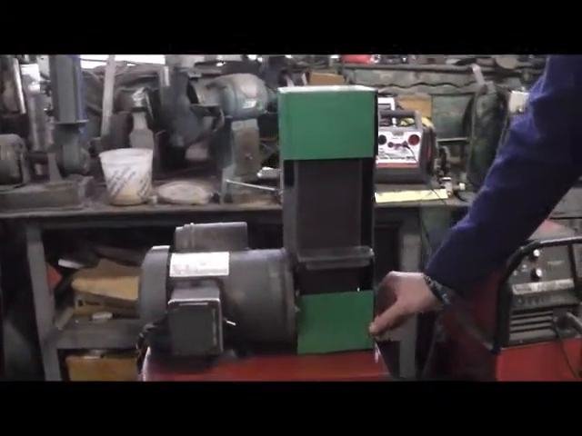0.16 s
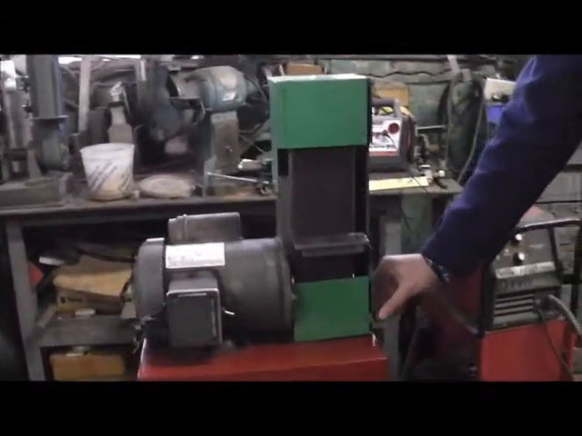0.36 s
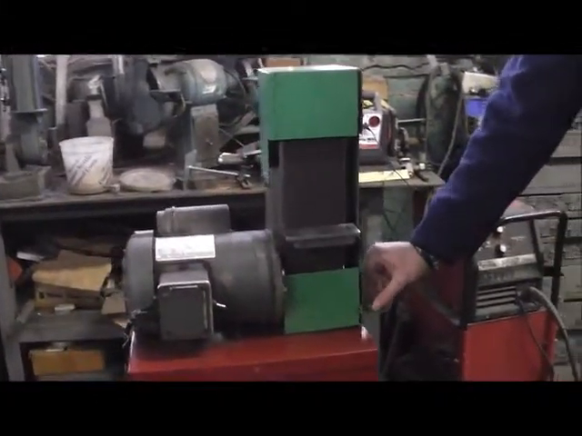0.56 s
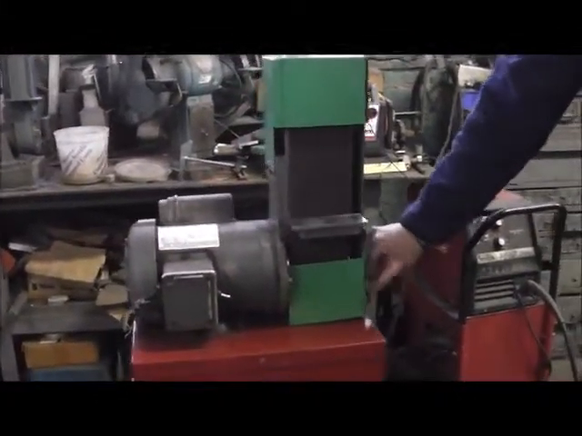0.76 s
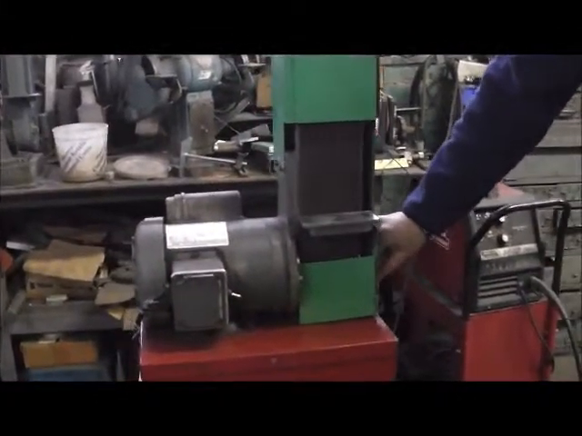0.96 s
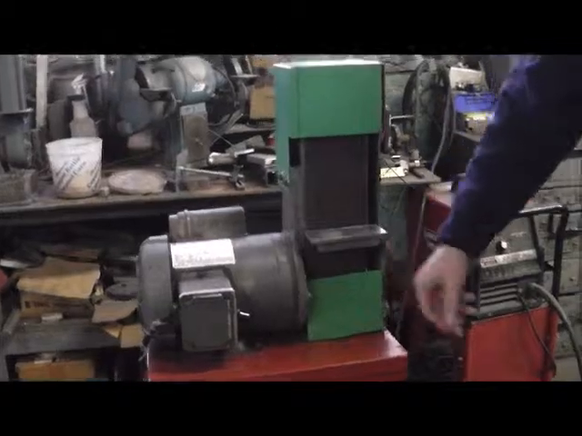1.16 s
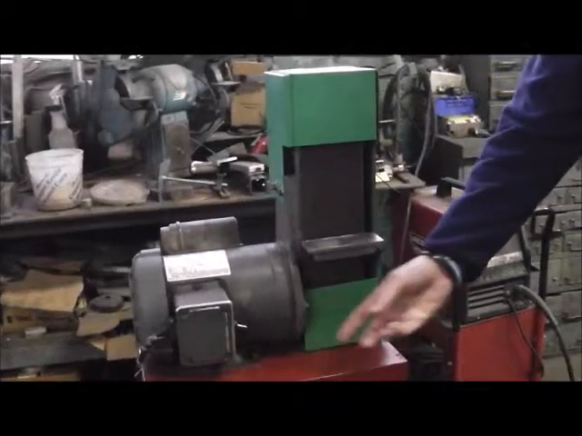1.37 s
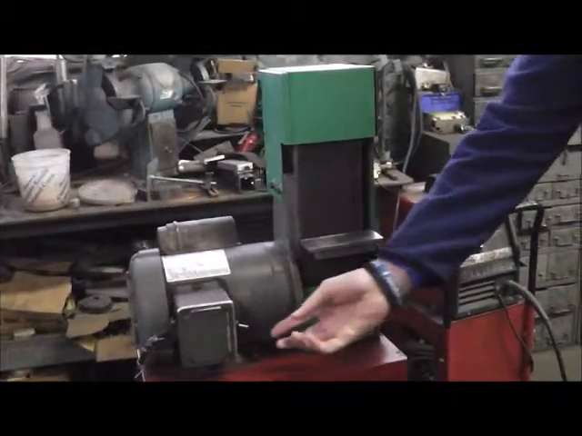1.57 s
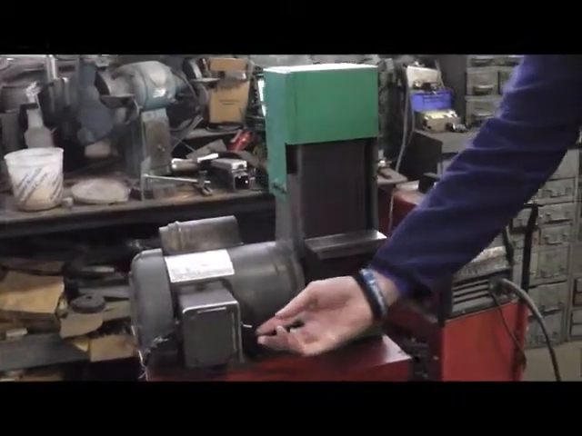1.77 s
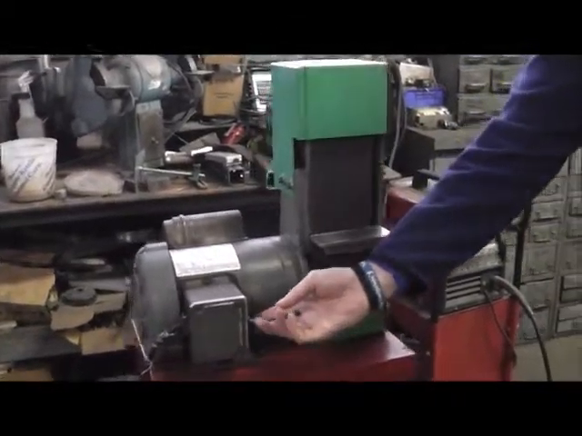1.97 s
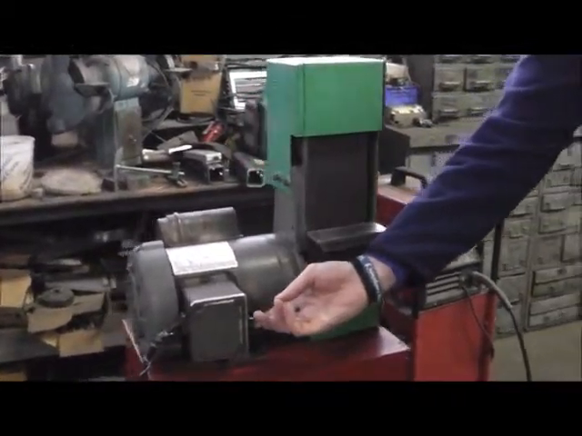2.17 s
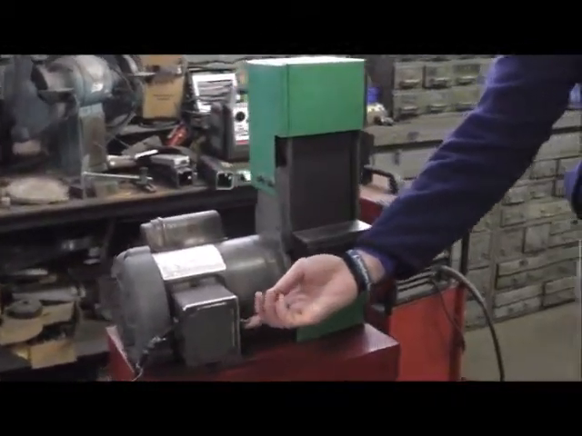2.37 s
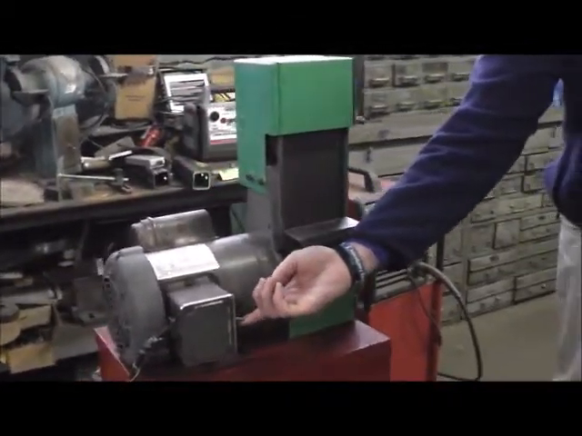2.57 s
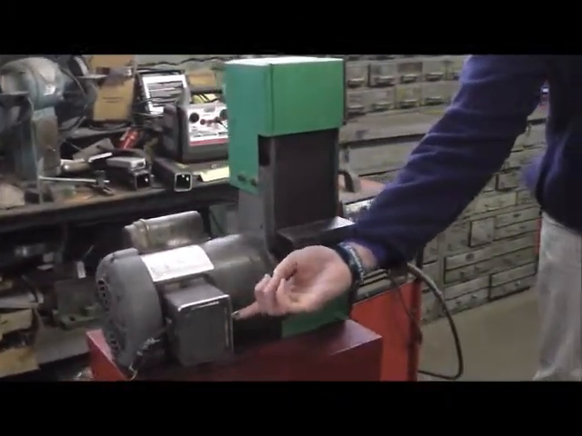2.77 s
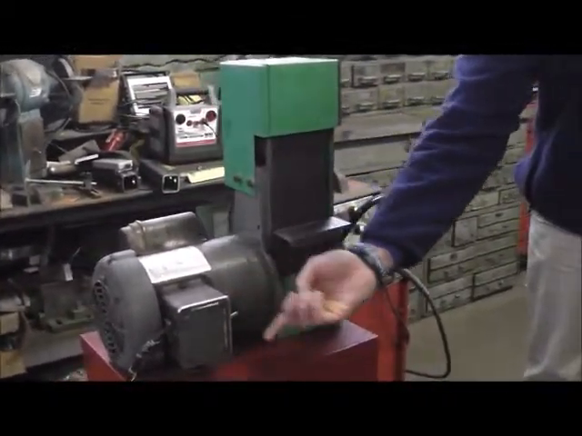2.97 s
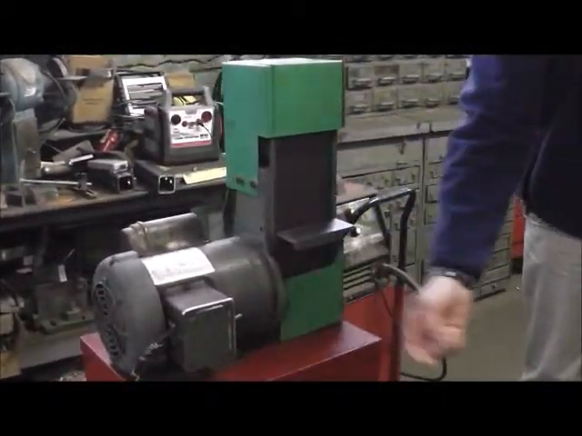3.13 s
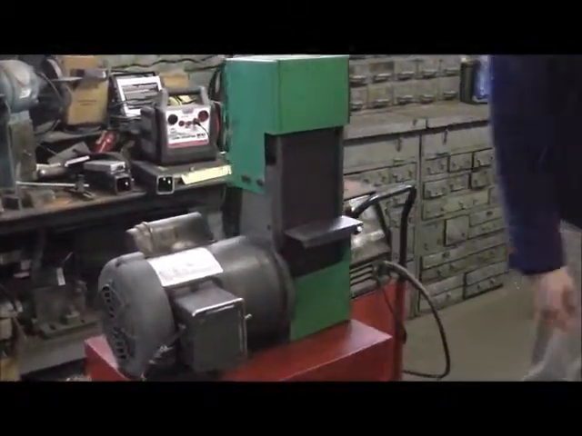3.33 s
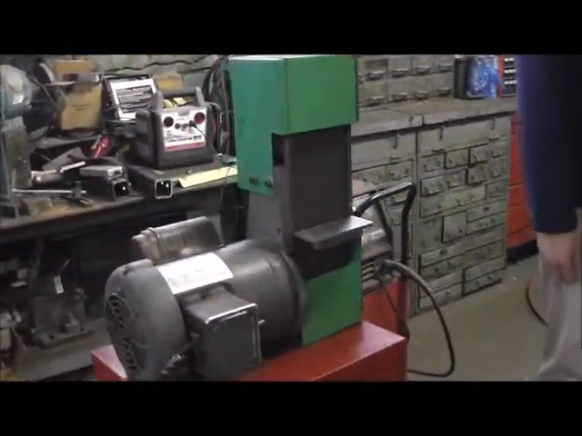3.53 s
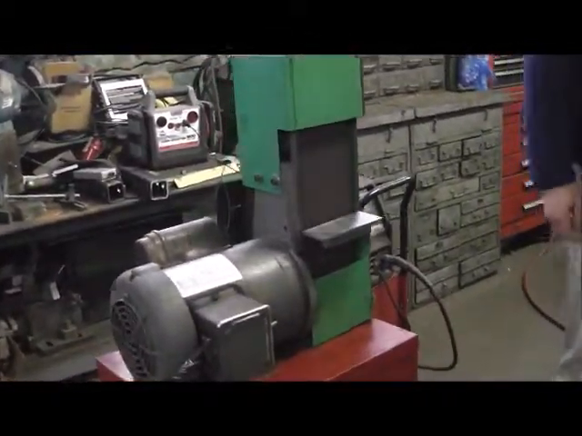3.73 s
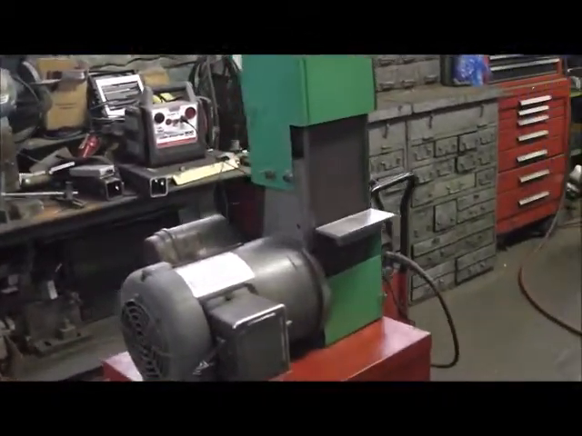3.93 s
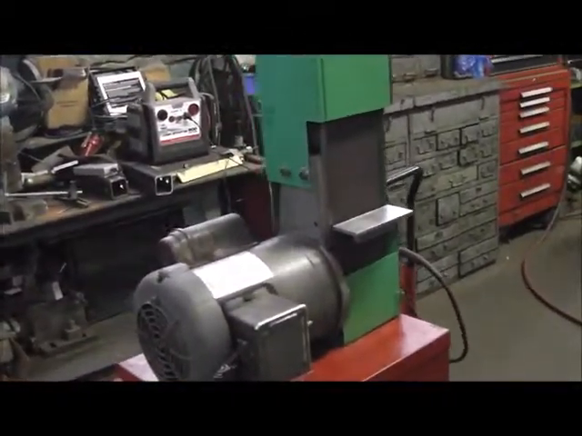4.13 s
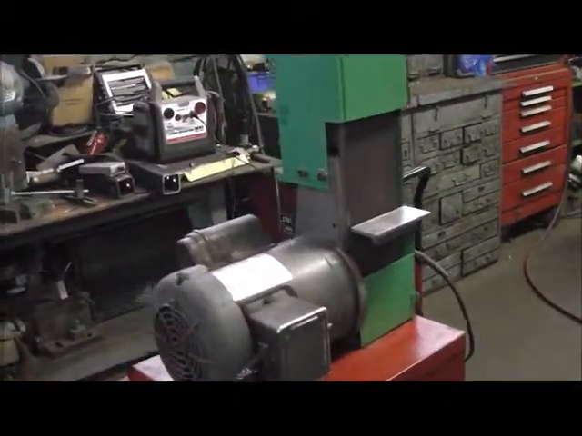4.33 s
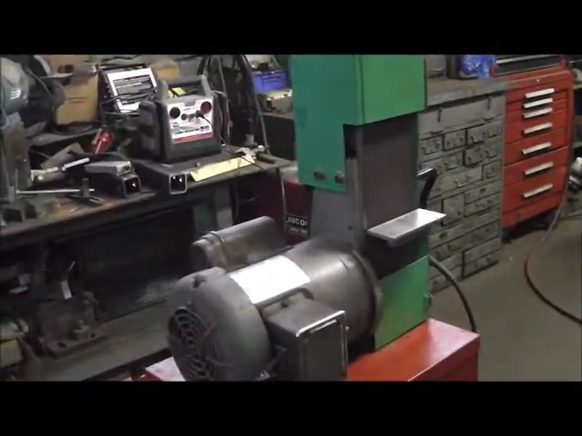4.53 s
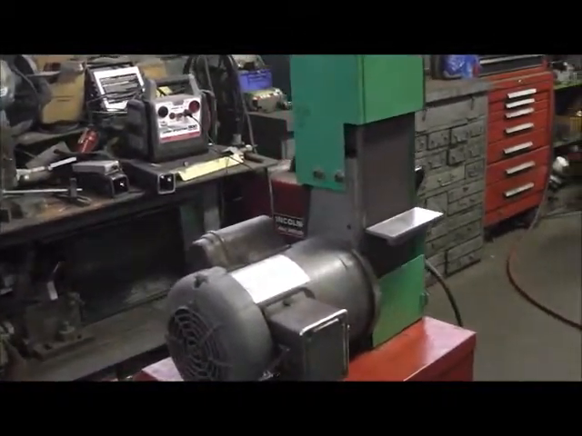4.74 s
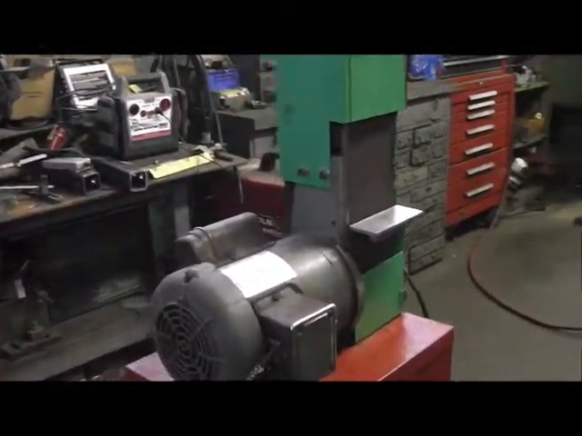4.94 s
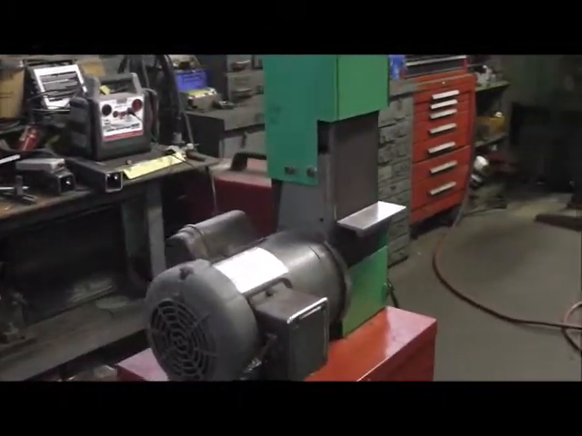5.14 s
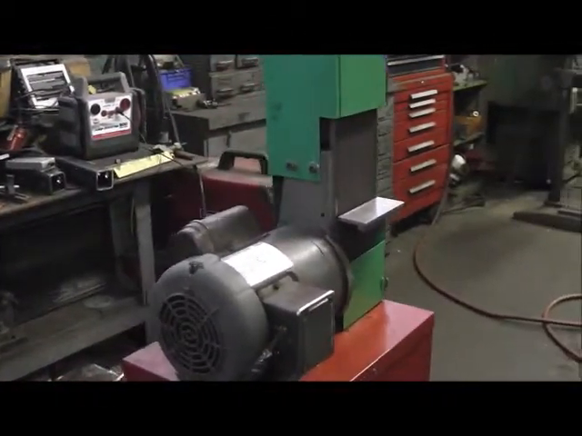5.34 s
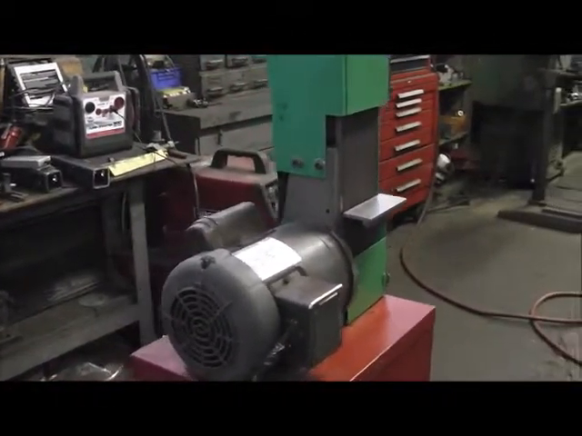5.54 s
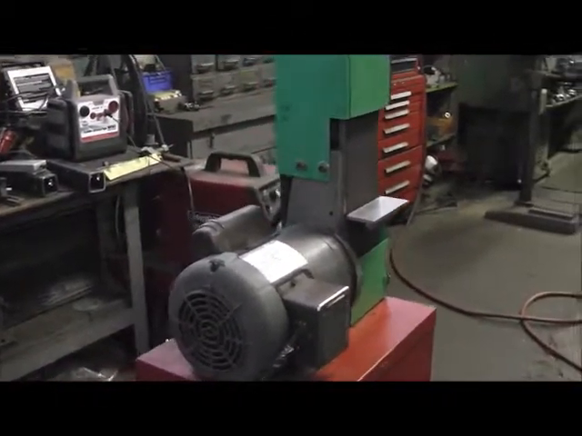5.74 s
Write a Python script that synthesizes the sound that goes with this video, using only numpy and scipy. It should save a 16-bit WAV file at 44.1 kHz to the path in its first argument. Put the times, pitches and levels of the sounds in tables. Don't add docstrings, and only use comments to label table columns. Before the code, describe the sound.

In an indoor machine shop with deep distant rumble, a hand knocks metal sharply, brushes and ticks against parts, and clatters on a bench. Just before three seconds a power switch snaps. A belt sander spins up in half a second with a rising whine and brief chirp, then runs steadily with singing fan tone, gritty hiss and air roar. Handheld camera microphone, close, slight room echo.

```python
import sys
import numpy as np
from scipy import signal
from scipy.fft import rfft, irfft, next_fast_len
from scipy.io import wavfile
from scipy.ndimage import map_coordinates

SR = 44100
rng = np.random.default_rng(int(sys.argv[2]) if len(sys.argv) > 2 else 0)


def to_linear_factor(level_db):
    exponent = np.asarray(level_db, float) / 20
    return 10 ** exponent


def master_out(mix):
    frames = np.transpose(np.atleast_2d(mix))
    ceiling = np.clip(frames, -1, 1)
    pcm = np.round(ceiling * 32767).astype(np.int16)
    wavfile.write(sys.argv[1], SR, pcm)


N = 255780

# time in seconds, rumble level in dB.
SHOP_RUMBLE = [(0, -31.5), (.11, -34.5), (.27, -26), (.32, -37.5), (.44, -29), (.69, -31), (.87, -24.5),
               (.93, -48.5), (1.13, -33), (1.25, -28), (1.37, -31), (1.76, -32), (1.89, -26), (2.16, -30),
               (2.42, -25.5), (2.74, -31), (2.83, -45), (2.88, -33.5)]
# frequency in Hz, level in dB per Hz.
RUMBLE_COLOUR = [(12, -32.5), (20, 5), (75, 4.5), (130, -6.5), (170, -45), (290, -120)]
DRONE_COLOUR = [(53, -27.5), (90, -8.5), (180, -2), (350, -10), (520, -11.5), (800, -13.5), (1200, -21),
                (1500, -22), (2050, -30), (2400, -42), (3300, -47.5), (4200, -70)]
DRONE_DB, DRONE_RISE_DB_PER_S = -39.5, 1.522
PRESSED_RUMBLE_DB, PRESSED_DRONE_DB = -37.5, -40.5

# peak in seconds, rise in seconds, fall in seconds, soft
# level in dB, bright level in dB.
RUSTLE = [
    (.3, .7, 0.154, -52, -59.5),
    (.655, 0.029, 0.033, -49.5, -45.5),
    (.7, 0.03, 0.0183, -42, -50.5),
    (.95, 0.135, 0.253, -54.5, -65),
    (1.61, 0.061, 0.095, -53, -48),
    (2.04, 0.0163, 0.045, -58.5, -51.5),
    (2.095, 0.016, 0.0624, -43, -42),
    (2.65, 0.185, 0.216, -62, -59),
]
# soft level in dB, bright level in dB.
STILL_DB = [-58.5, -61]
# frequency in Hz, level in dB per Hz.
SOFT_COLOUR = [(2600, -29.5), (3000, -10.5), (3800, -4.5), (4600, -1), (5600, -2), (6800, -2.5),
               (8500, -13.5), (11000, -41)]
BRIGHT_COLOUR = [(5500, -23), (7000, -6), (9000, -1), (11000, -2), (13000, -5.5), (15000, -12.5),
                 (17000, -13)]

# time in seconds, bright peak in dB, thud in dB over it,
# soft crack in dB over it, time to fall 60 dB in seconds.
KNOCKS = [
    (0.1163, -5, -14.5, -10.5, 0.0715),
    (0.4131, -22, -1.5, 1, 0.0475),
    (0.8765, -30.5, -3, -4.5, 0.028),
    (0.8934, -5.5, -17, -13, 0.0315),
    (0.8962, -3, -19, -11, 0.04),
    (0.908, -8, -11.5, -13.5, 0.025),
    (0.914, -6.5, -10, -9, 0.032),
    (1.026, -18, -10, -11, 0.0385),
    (2.0841, -21.5, -7.5, -9.5, 0.068),
]
SWITCH = [
    (2.7855, 0, -32, -12, 0.0178),
    (2.7878, -10, -29.5, -8, 0.0237),
    (2.8, -24.5, -9.5, -3.5, .03),
]
# time in seconds, bright peak in dB, thud in dB over it.
TICKS = [(0.433, -42, 11.5), (0.5013, -39.5, 6.5), (0.5614, -38, 3), (0.6025, -31.5, -0.5),
         (0.6791, -33, 0.6), (0.7039, -33, 3.5), (0.836, -47.5, 1), (1.609, -35, 3), (2.2094, -44, 8.5),
         (2.3477, -48.5, 13.5), (2.385, -46, 1), (2.4486, -41, -4.5), (2.4547, -44.5, 4)]
# frequency in Hz, level in dB per Hz.
THUD_COLOUR = [(240, -39.5), (400, -5.5), (686, -2.5), (953, -11), (1250, -2.5), (2410, -20), (3000, -28.5),
               (3900, -58), (6600, -120)]
# frequency in Hz, level in dB,
# time to fall 60 dB in seconds.
PLATE = [(825, -8.5, 0.194), (1273.5, -6.5, 0.11), (1773, -11, .09), (1938, -1.5, 0.051), (4983, 1, .07),
         (5160, -6, 0.054), (5090, -26.5, .3), (5200, -30.5, 0.28)]
BENCH = [(317.6, -2, 0.52), (480.8, -6.5, 0.255), (656, -2, 0.27), (790.5, -3.5, 0.187),
         (1059.6, -3.5, .25), (1276, -4.5, 0.304), (1774, -7.5, 0.26), (4900, -17.5, .4)]
# time in seconds, level in dB.
PLATE_BLOWS = [
    (0.117, -16),
    (.413, -35.5),
]
BENCH_BLOWS = [
    (.897, -27.5),
    (.912, -24.5),
]

# time in seconds, peak in dB, time to fall 60 dB in seconds.
SNAPS = [
    (1.5016, -17.5, .012),
    (1.5971, -15, .012),
    (2.7876, -8.5, .025),
]
# frequency in Hz, width in Hz, level in dB.
HOUSING = [(700, 600, -5), (1434, 350, 1), (2058, 400, -4.5), (3200, 800, -22), (4570, 800, -20)]

# frequency in Hz, time to fall 60 dB in seconds.
HALL = [(300, 1), (2000, 1), (6000, 0.633), (10000, 0.498), (14000, 0.31)]
# frequency in Hz, side over mid in dB.
SIDE_DB = [(60, -17.5), (110, -17), (200, -23), (380, -19), (700, -17.5), (1290, -20), (2380, -19),
           (4400, -13), (8120, -17.5), (15000, -7)]

# time in seconds, share of full speed.
SPEED = [(2.79, 0), (2.935, .3), (3.03, .495), (3.065, .61), (3.12, .78), (3.17, .88), (3.2, .925),
         (3.245, .998), (3.3, 1)]
SHAFT_HZ, BLADES = 59.43, 11
LAP = 2159

# time in seconds, level in dB.
NEARNESS = [(3.19, -18.5), (3.36, -19), (3.39, -23.5), (3.44, -19), (3.57, -21), (3.97, -18.5), (4.12, -20),
            (4.44, -19), (4.47, -22), (4.75, -20.5), (5.18, -19.5), (5.21, -21.5), (5.34, -19.5),
            (5.48, -19), (5.61, -21), (5.8, -18)]
# frequency in Hz, level in dB per Hz.
ROAR_COLOUR = [(35, -50.5), (60, -33.5), (160, -33), (251, -6), (350, -13), (577, -7), (648, -2.5),
               (716, -6), (1220, -7), (1300, -6), (1390, -6), (2010, -11), (2220, -19), (3200, -38),
               (4160, -64.5), (7040, -120)]
GRIT_COLOUR = [(1650, -39.5), (2800, -9), (3240, -12.5), (3720, -9), (4060, -2.5), (6020, -4.5),
               (7390, -0.5), (10600, 2), (13100, -6.5), (15000, -14), (17000, -18)]
ROAR_DB, GRIT_DB = -22.5, -19.5
AWAKE_SHARE, WAKE_DB = 0.4752, 55.5
# multiple of the lap rate, level in dB.
DENTS = [(20, -35.5), (21, -35.5), (22, -35), (23, -32), (25, -38.5), (26, -31), (29, -31), (31, -35),
         (36, -28.5), (39, -30.5), (59, -31), (81, -43.5), (83, -41.5), (87, -42.5), (89, -36.5),
         (99, -37.5)]

# multiple of the blade rate, full level in dB,
# speed share where it is fully awake, dB lost per share below that.
FAN = [(1, -20, .76, 150), (2, -17, 0.969, 124.5), (3, -37.5, 1, 38)]
# time in seconds, half length in seconds, lift in dB.
FAN_ZONES = [
    (3.2, .3, 2.5),
    (4.1, 0.32, 1.05),
    (4.953, 0.66, 7.5),
]
FAN_PASS_DB, FAN_PASS_SHARE, FAN_PASS_WIDTH = 3, 0.772, 0.132
GLIDE_ROUGH_DB = 20
# time in seconds,
# half length in seconds, low tones in dB, middle tones in dB.
HUM = [
    (3.374, 0.064, -28.5, -44.5),
    (3.549, 0.11, -38.5, -33),
    (4.075, 0.1, -43.5, -31.5),
    (4.304, 0.172, -27.5, -24.5),
    (4.718, 0.18, -42, -24),
    (4.998, 0.128, -49, -32),
    (5.68, 0.145, -27, -23),
]
HUM_LEAST_DB = -47
# multiple of the shaft rate, level in dB.
LOW_ORDERS = [(1, -9.5), (2, -2)]
MID_ORDERS = [(4, -3.5), (4.97, -4), (6, -14), (8, -12)]
SLOT_DB, SLOT_SHARE = -21.5, .49
SLOT_RISE_DB, SLOT_FALL_DB = 62, 80
# time in seconds, level in dB.
SQUEALS = [
    (2.935, -26.5),
    (2.963, -22),
    (3.003, -37),
]
SQUEAL_S = 0.0078
# time in seconds, first frame mode in dB, second in dB.
STRAIN = [
    (2.84, -28, -28),
    (2.868, -34.5, -29),
    (2.896, -26.5, -19),
    (2.931, -28, -21),
    (2.952, -25.5, -15),
    (2.994, -17.5, -19.5),
    (3.014, -28, -14),
    (3.043, -31.5, -18),
    (3.13, -26, -33),
]
THROB_S = [0.02, .01]
# frequency in Hz, level in dB.
FRAME = [
    [(250, -1)],
    [(515, 0.5), (560, -8.5), (770, -11), (1240, -17.5)],
]

# frequency in Hz, left over right in dB.
LEAN = [(60, 1), (110, 1), (200, 1.0), (380, 1.5), (700, 1.0), (1290, 1.5), (2380, 2), (4400, -2),
        (10000, -3), (13500, -2.47)]
# frequency in Hz, radians by which left leads.
LAG = [(0, 0.084), (7240, -0.024), (10800, 0.12), (12600, 1.67), (14600, 0.18), (16400, -0.0)]
HISS_DB, TOP_HZ = -64.5, 15720


def unit(x):
    return x / np.sqrt(np.mean(x ** 2) + 1e-20)


def along(points, hz):
    f, v = np.transpose(points)
    return np.interp(np.log(hz + 1), np.log(f + 1), v)


def curves(rows):
    s, *cols = np.transpose(rows)
    return [np.interp(np.arange(N) / SR, s, c) for c in cols]


def wobble(rate):
    coarse = np.arange(0, N + 32, 32)
    knots = rng.standard_normal(int(N * rate / SR) + 4)
    return np.interp(np.arange(N), coarse, map_coordinates(knots, [coarse * rate / SR]))


def swell(s, rise, fall, order=2):
    coarse = np.arange(0, N + 32, 32)
    late = coarse / SR - s
    bell = np.exp(-np.abs(late / np.where(late < 0, rise, fall)) ** order)
    return np.interp(np.arange(N), coarse, bell)


def summed_db(gains):
    return 20 * np.log10(sum(gains) + 1e-7)


def coloured(x, spectrum):
    m = next_fast_len(N + 8192)
    gain = to_linear_factor(along(spectrum, np.fft.rfftfreq(m, 1 / SR)))
    return irfft(rfft(x, m) * gain, m)[..., :N]


def spread(pair, spectrum):
    mid, side = coloured(pair, spectrum)
    side = coloured(side, SIDE_DB)
    return unit(np.array([mid + side, mid - side]))


def tone(turns, multiple, db, rough_db, pace=25):
    strength = np.sqrt(2) * to_linear_factor(db + rough_db * wobble(pace))
    return strength * np.sin(2 * np.pi * (multiple * turns + rng.random()))


def room_noise(spectrum):
    return spread(rng.standard_normal((2, N)), spectrum)


def shop(speed):
    pressing = np.minimum(4 * speed, 1)
    rumble_db = curves(SHOP_RUMBLE)[0]
    rumble_db = rumble_db + (PRESSED_RUMBLE_DB - rumble_db) * pressing
    rumble = to_linear_factor(rumble_db + 1.49 * wobble(11)) * room_noise(RUMBLE_COLOUR)
    drone_db = DRONE_DB + DRONE_RISE_DB_PER_S * np.arange(N) / SR
    drone_db = drone_db + (PRESSED_DRONE_DB - drone_db) * pressing
    drone = to_linear_factor(drone_db + 8.5 + 1.2 * wobble(3.005) + 1.18 * wobble(14)) * room_noise(DRONE_COLOUR)
    soft, bright = to_linear_factor(STILL_DB[0]), to_linear_factor(STILL_DB[1])
    for s, rise, fall, soft_db, bright_db in RUSTLE:
        stroke = swell(s, rise, fall, order=1)
        soft = soft + to_linear_factor(soft_db) * stroke
        bright = bright + to_linear_factor(bright_db) * stroke
    grain = to_linear_factor(1.29 * wobble(90) + 0.31 * wobble(24.98))
    return rumble + drone + grain * (soft * room_noise(SOFT_COLOUR) + bright * room_noise(BRIGHT_COLOUR))


def knocks():
    out, t = np.zeros((2, N + SR)), np.arange(SR // 2) / SR
    bright, soft, thud = [unit(coloured(rng.standard_normal(N), colour))
                          for colour in (BRIGHT_COLOUR, SOFT_COLOUR, THUD_COLOUR)]
    ticks = [(s, db, thud_db, -2.5, 0.0464) for s, db, thud_db in TICKS]
    for s, db, thud_db, soft_db, t60 in KNOCKS + ticks + SWITCH:
        pan_db = 2.5 * s * (s < SWITCH[0][0])
        at = slice(round(s * SR), round(s * SR) + len(t))
        crack = bright[at] + to_linear_factor(soft_db) * soft[at]
        crack = crack * to_linear_factor(-60 * t / t60) * (1 - np.exp(-t / 0.000313))
        dull = thud[at] * to_linear_factor(thud_db + 7 - 60 * t / (1.797 * t60)) * (1 - np.exp(-t / 0.001))
        out[:, at] += to_linear_factor(db - 6) * to_linear_factor([[pan_db / 2], [-pan_db / 2]]) * (crack + dull)
    for modes, blows in ((PLATE, PLATE_BLOWS), (BENCH, BENCH_BLOWS)):
        for s, blow_db in blows:
            ring = sum(to_linear_factor(db + rng.normal(0, 2.0) - 60 * t / t60) * np.sin(2 * np.pi * hz * t)
                       for hz, db, t60 in modes)
            out[:, round(s * SR):][:, :len(t)] += to_linear_factor(blow_db) * ring
    return out[:, :N]


def snaps():
    out, t = np.zeros(N + SR), np.arange(SR // 4) / SR
    for s, db, t60 in SNAPS:
        blow = 0.72 + rng.standard_normal(len(t))
        out[round(s * SR):][:len(t)] += to_linear_factor(db + 13.5 - 60 * t / t60) * blow
    f = np.fft.rfftfreq(len(out), 1 / SR)
    body = 0
    for k, (centre, width, db) in enumerate(HOUSING):
        resonance = 1j * f * width / (centre * centre - f * f + 1j * f * width)
        body = body + (-1) ** k * to_linear_factor(db) * resonance
    return irfft(rfft(out) * body, len(out))[:N]


def hall(x):
    hz, t, z = signal.stft(rng.standard_normal((2, SR)), SR, nperseg=256)
    decay = to_linear_factor(-60 * t / along(HALL, hz)[:, None])
    near, far = signal.istft(z * decay, SR, nperseg=256)[1]
    tail = np.array([near + 0.474 * far, near - 0.35 * far]) / np.linalg.norm(near)
    delayed = np.pad(x, ((0, 0), (300, 0)))
    return signal.fftconvolve(delayed, tail, axes=1)[:, :N]


def looped(speed, memory, share):
    share = share * speed ** 4
    laps = rng.standard_normal((2, N // LAP + 22, LAP))
    surface = signal.lfilter([1], [1, -memory], laps, axis=1)[:, 20:]
    surface = unit(surface.reshape(2, -1))
    passing = surface[:, np.cumsum(speed).astype(int)]
    return np.sqrt(share) * passing + np.sqrt(1 - share) * rng.standard_normal((2, N))


def belt(speed):
    near_db = curves(NEARNESS)[0] - np.mean(NEARNESS, axis=0)[1]
    drive_db = near_db * speed - WAKE_DB * np.maximum(AWAKE_SHARE - speed, 0)
    drive_db = np.where(speed > 0, drive_db, -120)
    roar_db = ROAR_DB + drive_db + 0.54 * wobble(9)
    grit_db = GRIT_DB + drive_db
    laps = np.cumsum(speed) / LAP
    seam_db = 0.984 * np.sin(4 * np.pi * laps) + .5 * np.sin(2 * np.pi * laps)
    seam_db = seam_db + 0.44 * np.sin(12 * np.pi * laps)
    roar = spread(looped(speed, memory=0.898, share=0.275), ROAR_COLOUR)
    roar = to_linear_factor(roar_db + 6 + 0.8 * wobble(30)) * roar
    grit = spread(looped(speed, memory=0.523, share=0.996), GRIT_COLOUR)
    grit = to_linear_factor(grit_db + seam_db + 0.58 * wobble(14)) * grit
    dents = sum(tone(laps, k, roar_db + 20.5 + db, rough_db=2.0, pace=3.039) for k, db in DENTS)
    return roar + grit + dents * speed ** 8


def fan(speed, turns):
    out = 0
    for i, ((k, db, awake, lost_db), (s, half, zone_db)) in enumerate(zip(FAN, FAN_ZONES)):
        lift_db = zone_db * swell(s, half, half) + GLIDE_ROUGH_DB * (1 - speed) * wobble(70)
        if i == 0:
            lift_db = lift_db + FAN_PASS_DB * np.exp(-((speed - FAN_PASS_SHARE) / FAN_PASS_WIDTH) ** 2)
        tone_db = db + lift_db - lost_db * np.maximum(awake - speed, 0) + 0.5 * wobble(4.056)
        out = out + tone(turns, BLADES * k, tone_db, rough_db=1.0, pace=18)
    return out


def shaft_hum(speed, turns):
    least = to_linear_factor(HUM_LEAST_DB) * speed ** 8
    low_db = summed_db([least] + [to_linear_factor(low) * swell(s, half, half) for s, half, low, _ in HUM])
    mid_db = summed_db([least] + [to_linear_factor(mid) * swell(s, half, half) for s, half, _, mid in HUM])
    low = sum(tone(turns, k, low_db + db, rough_db=1.5) for k, db in LOW_ORDERS)
    mid = sum(tone(turns, k, mid_db + db, rough_db=2.06, pace=12) for k, db in MID_ORDERS)
    return low + mid


def starting_whines(speed, turns):
    slot_db = SLOT_DB - SLOT_RISE_DB * np.maximum(SLOT_SHARE - speed, 0)
    slot_db = slot_db - SLOT_FALL_DB * np.maximum(speed - SLOT_SHARE, 0)
    slots = tone(turns + .0025 * wobble(150), 68, slot_db, rough_db=2.0, pace=90)
    bearing_db = summed_db(to_linear_factor(db) * swell(s, SQUEAL_S, SQUEAL_S) for s, db in SQUEALS)
    return slots + tone(turns, 434, bearing_db, rough_db=2, pace=70)


def shaken_frame():
    out = 0
    for m, (half, modes) in enumerate(zip(THROB_S, FRAME)):
        strain_db = summed_db(to_linear_factor(row[m + 1]) * swell(row[0], half, half) for row in STRAIN)
        for hz, db in modes:
            out = out + tone(np.arange(N) / SR, hz, strain_db + db, rough_db=1.2, pace=60)
    return out


def motor(speed):
    turns = np.cumsum(speed) * SHAFT_HZ / SR
    return fan(speed, turns) + shaft_hum(speed, turns) + starting_whines(speed, turns) + shaken_frame()


def scene():
    speed = curves(SPEED)[0]
    hits, plastic = knocks(), snaps()
    before_switch = np.arange(N) < SPEED[0][0] * SR - 600
    wet_db = np.where(before_switch, -7.5, -12.5)
    echo = hall(to_linear_factor(wet_db) * hits + to_linear_factor(-11.5) * plastic)
    return shop(speed) + hits + plastic + echo + belt(speed) + motor(speed)


def top_cut(x):
    return signal.sosfilt(signal.butter(12, 16800, fs=SR, output="sos"), x)


def record(dry):
    m = next_fast_len(N + 8192)
    hz = np.fft.rfftfreq(m, 1 / SR)
    half = to_linear_factor(along(LEAN, hz) / 2) * np.exp(.5j * along(LAG, hz))
    held = dry / (1 + np.abs(dry / 1.47) ** 6) ** (1 / 6)
    held = held + to_linear_factor(HISS_DB) * rng.standard_normal(dry.shape)
    ports = irfft(rfft(held, m) * [half, 1 / half] * (hz < TOP_HZ), m)[:, :N]
    return top_cut(ports)


dry = scene()
out = record(dry)
master_out(out)
```